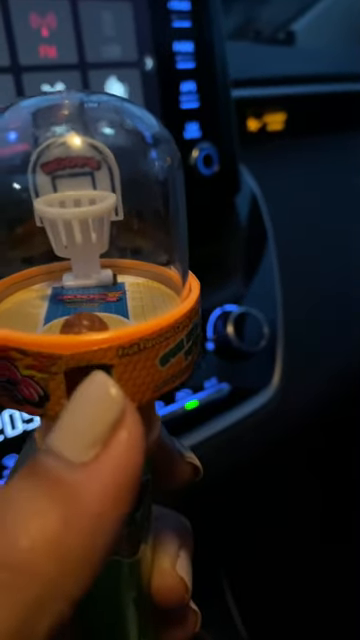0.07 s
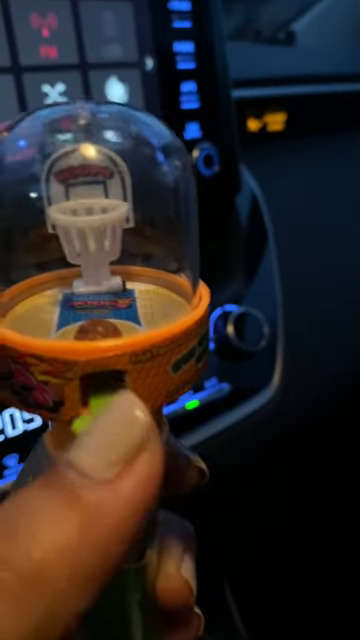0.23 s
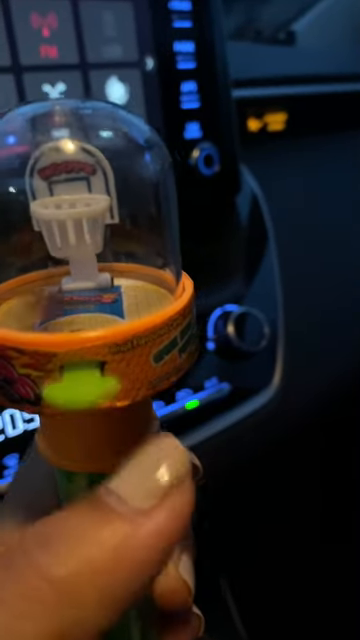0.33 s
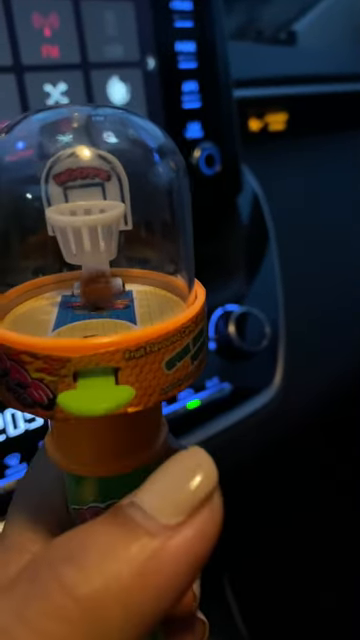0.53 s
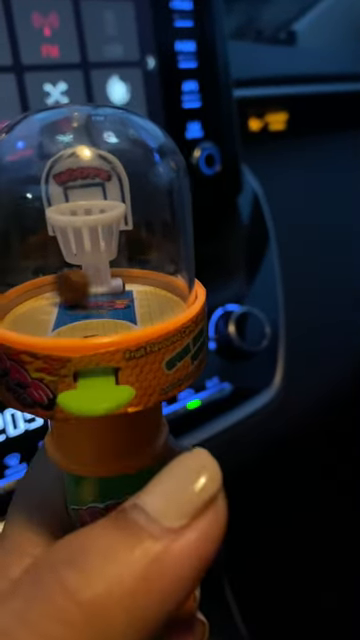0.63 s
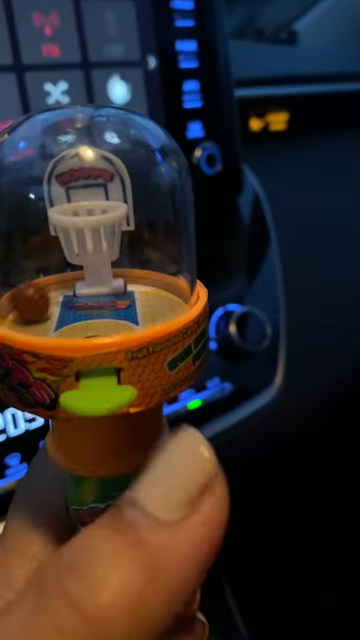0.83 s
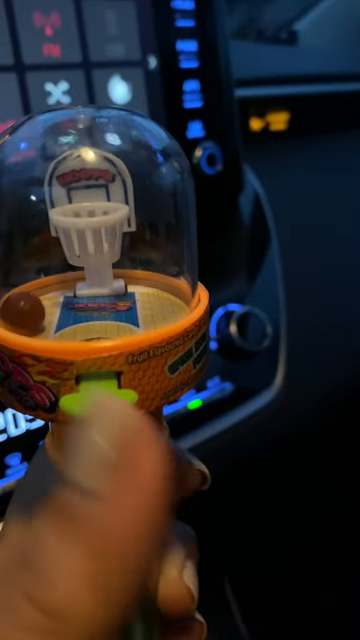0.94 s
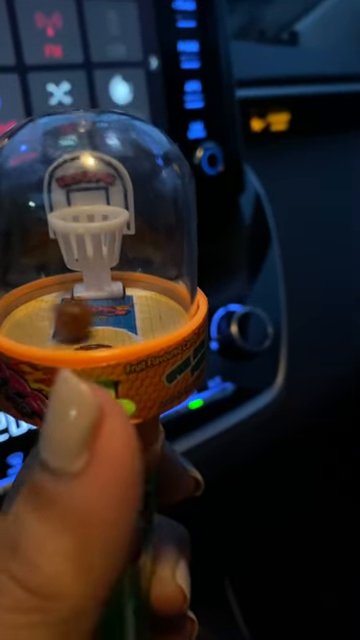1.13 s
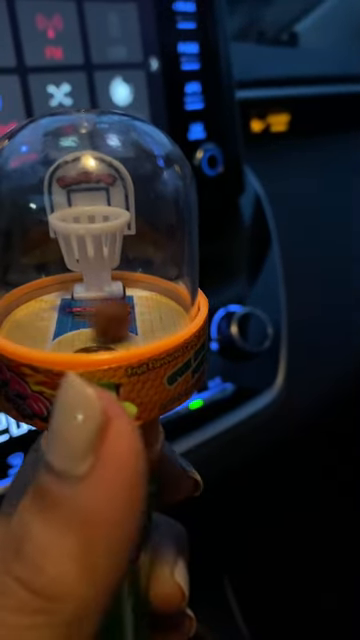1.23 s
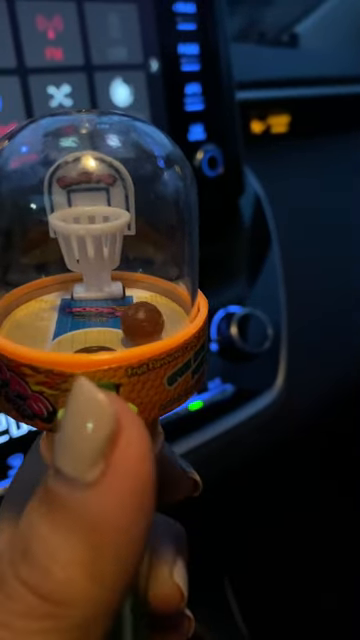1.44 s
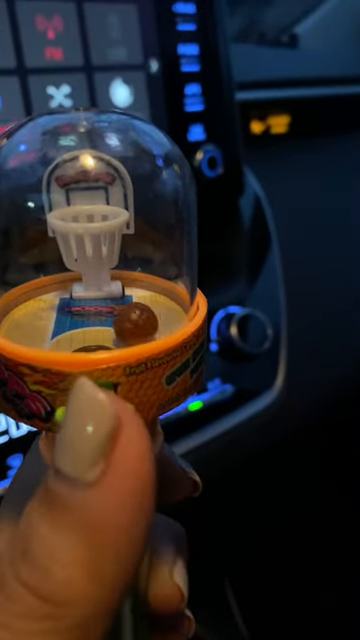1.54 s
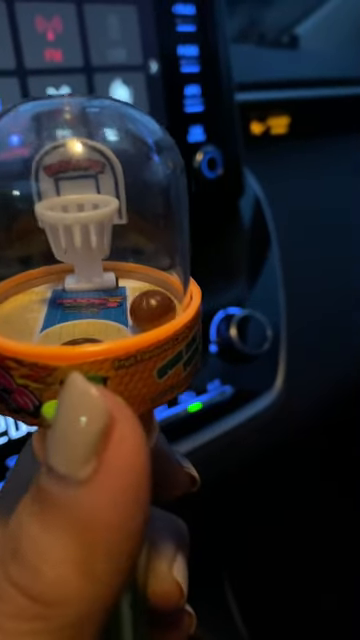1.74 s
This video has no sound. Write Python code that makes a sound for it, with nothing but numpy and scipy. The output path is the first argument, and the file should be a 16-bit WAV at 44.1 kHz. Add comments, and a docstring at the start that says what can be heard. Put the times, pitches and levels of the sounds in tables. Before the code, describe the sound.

Close up inside a softly humming parked car, a plastic toy's lever lets go with one loud snap. A tiny ball then ticks and rattles unevenly around the toy's dome and floor, growing fainter.

```python
"""Toy basketball in a parked car

A thumb flicks the lever of a small plastic toy, close to the microphone. The lever scrapes and snaps,
the ball pings, clicks against the clear dome, then bounces and rolls on the court. Each hit is a set of
ringing plastic modes over a burst of clatter. The car hums softly underneath, its cabin adds a short
echo, and the recorder's gain control ducks after the snap."""
import sys
import numpy as np
from scipy import signal
from scipy.fft import rfft, irfft
from scipy.io import wavfile
from scipy.ndimage import uniform_filter1d, minimum_filter1d

SR = 44100
rng = np.random.default_rng(int(sys.argv[2]) if len(sys.argv) > 2 else 0)


def dump_mix(stems):
    """Bounce the given channels to the path in sys.argv[1] as a 16-bit WAV at rate SR."""
    frames = np.atleast_2d(stems).T  # one column per channel
    limited = np.clip(frames, -1, 1)  # hard clip at full scale
    pcm = np.round(limited * 32767).astype(np.int16)
    wavfile.write(sys.argv[1], SR, pcm)


N = 79380

# Spectrum of the car's rumble (frequency [Hz], relative level [dB])
RUMBLE_SPECTRUM = [(12, -30.5), (20, -13), (81, -4.5), (138, -5.5), (187, -13.5), (270, -8), (357, -18),
                   (446, -12.5), (678, -19.5), (1530, -36.5), (1960, -46), (2260, -43), (3250, -53),
                   (3740, -52.5), (16000, -66)]
RUMBLE_DB = -52.5
# Resonances of the clear dome (frequency [Hz], relative level [dB], t60 [s])
DOME_MODES = [(2130, -16, 0.058), (2720, -17.5, .028), (4750, -19.5, 0.066), (5840, -13, .026),
              (5880, -16.5, 0.023), (8910, -10, 0.066), (11300, -21.5, .03), (15450, -20, .02)]
# Spectrum of the dome's clatter (frequency [Hz], relative level [dB])
DOME_CLATTER = [(150, -33), (550, -10), (1500, -22.5), (2400, -7), (3300, -11.5), (5500, -7.5),
                (8000, -11.5), (11500, -13.5), (12500, -19), (15500, -18)]
DOME_T60_S = .035


def amp(db):
    """Decibels to gain."""
    return 10 ** (np.asarray(db) / 20)


def curve_at(points, hz):
    """Reads a curve of (frequency, value) points on a log-frequency axis."""
    point_hz, value = np.transpose(points)
    return np.interp(np.log(hz + 1), np.log(point_hz + 1), value)


def equalise(x, curve):
    """Minimum-phase EQ along a (frequency [Hz], gain [dB]) curve, so attacks stay sharp."""
    hz = abs(np.fft.fftfreq(len(x), 1 / SR))
    log_gain = np.log(amp(curve_at(curve, hz)))
    response = np.exp(np.conj(signal.hilbert(log_gain)))
    return np.fft.ifft(np.fft.fft(x) * response).real


def rumble(level_db):
    """The car's steady, bass-heavy noise at a given rms level."""
    shape = amp(curve_at(RUMBLE_SPECTRUM, np.fft.rfftfreq(N, 1 / SR)))
    noise = irfft(rfft(rng.standard_normal(N)) * shape, N)
    return amp(level_db) * noise / np.sqrt(np.mean(noise ** 2))


def idle_hum(waver_depth=.75, waver_s=.22):
    """The idling car: low tones, each wavering slowly in level and phase."""
    # Tones of the hum (frequency [Hz], level before wavering [dB])
    tones = [(25.4, -60.5), (51, -52.5), (75.3, -52.5), (101.8, -61.5), (127, -58), (255, -64.5),
             (301, -66), (458, -66)]
    t, bin_hz = np.arange(N) / SR, np.fft.fftfreq(N, 1 / SR)
    slow_band = np.exp(-(bin_hz * waver_s) ** 2) * (bin_hz > 0)
    hum = np.zeros(N)
    for hz, db in tones:
        drift = np.fft.ifft(np.fft.fft(rng.standard_normal(N)) * slow_band)
        waver = 1 + waver_depth * drift / np.std(drift)
        tone = np.exp(2j * np.pi * (hz * t + rng.random()))
        hum += np.sqrt(2) * amp(db) * (waver * tone).real
    return hum


def strike(modes, clatter, clatter_t60_s, level_db, bass_db, treble_db, spot_hz=None, spot_db=0):
    """One hit on plastic: modes over a quick clatter, coloured by the contact, plus the spot's ring."""
    attack_s, detune = .0004, .014
    crack_db, crack_t60_s = 2, .007
    spot_swell_s, spot_t60_s = .0018, .026
    t = np.arange(6144) / SR
    onset = t < .008  # the layers are balanced over this stretch
    ring = np.zeros(len(t))
    for hz, db, t60_s in modes:
        loss_db = 8 * np.sqrt(hz / 2200) * (1 - rng.random())  # high modes vary most from hit to hit
        detuned_hz = hz * (1 + detune * (2 * rng.random() - 1))
        ring += amp(db - loss_db - 60 * t / t60_s) * np.sin(2 * np.pi * detuned_hz * t)
    crack = amp(crack_db - 60 * t / crack_t60_s)  # the contact itself cracks first
    fade = crack + amp(-60 * t / clatter_t60_s)
    burst = equalise(rng.choice([-1., 1.], len(t)) * fade, clatter)
    hit = (ring + burst) * np.minimum(t / attack_s, 1)
    contact_eq = [(456, 0), (1200, bass_db), (2180, 0), (9000, treble_db)]
    hit = equalise(hit / np.std(hit[onset]), contact_eq)
    if spot_hz:
        envelope = np.minimum(t / spot_swell_s, 1) * amp(-60 * t / spot_t60_s)
        spot = np.sin(2 * np.pi * spot_hz * t) * envelope
        hit = (hit + amp(spot_db) * spot / np.std(spot[onset])) / np.hypot(1, amp(spot_db))
    return amp(level_db) * hit


def play_hits(hits, modes, clatter, clatter_t60_s):
    """Strikes one plastic part afresh at each listed time."""
    track = np.zeros(N)
    for time_s, *contact in hits:
        hit = strike(modes, clatter, clatter_t60_s, *contact)
        slot = track[round(time_s * SR):][:len(hit)]
        slot += hit[:len(slot)]
    return track


def bumps(start_s, end_s, level_db, per_s, treble_db, jitter=.13, spread_db=4):
    """Lists an uneven run of up to 16 tiny hits, from rolling or dragging."""
    return [(start_s + (k + jitter * late) / per_s, level_db + spread_db * strong, 0, treble_db)
            for k, (late, strong) in enumerate(rng.standard_normal((16, 2)))
            if start_s + k / per_s < end_s]


def lever_scrape():
    """The lever drags faintly before it lets go: quick slips, voiced with the dome's resonances."""
    slips = bumps(start_s=.175, end_s=.203, level_db=-61, per_s=330, treble_db=-8.5)
    return play_hits(slips, DOME_MODES, DOME_CLATTER, DOME_T60_S)


def lever_snap():
    """The lever lets go in a tight cluster of plastic knocks."""
    # Lever knocks (time [s], level [dB], bass [dB], treble [dB], spot ring [Hz], ring vs hit [dB])
    knocks = [(.2035, -30, 0.5, -10.5, 5850, -9), (.2149, -15.5, -6, 1.5, 3376, -6),
              (.2185, -25, 11.5, -3, 987, -2.5), (.2703, -28, 7, 6.5, 2030, -4)]
    # Resonances of the lever (frequency [Hz], relative level [dB], t60 [s])
    modes = [(610, -6, .04), (722, 8, .036), (815, 3, .03), (1048, 4, .045), (2010, -8, .07),
             (3263, 9, .016), (3520, 9, .015), (5700, 9, .024), (7000, 3, .014), (8750, -1, .024),
             (11300, -1, .02), (15400, -3, .014)]
    # Spectrum of its clatter (frequency [Hz], relative level [dB])
    clatter = [(80, 4), (450, -3), (750, 5), (1500, -1), (2200, 8), (3300, 10), (4300, 8), (6000, 10),
               (11700, 6.5), (12800, 1), (15500, 3)]
    return play_hits(knocks, modes, clatter, clatter_t60_s=.047)


def hand_thump(start_s=.222, hz=90, level_db=-32, t60_s=.14):
    """The snap jolts the whole toy in the hand: a soft, low thud."""
    t = np.maximum(np.arange(N) / SR - start_s, 0)
    return amp(level_db - 60 * t / t60_s) * np.sin(2 * np.pi * hz * t)


def ball_pings():
    """The launched ball lands two hard, bright hits."""
    # Hard hits (time [s], level [dB], bass [dB], treble [dB], spot ring [Hz], ring vs hit [dB])
    pings = [(0.2316, -16.5, 2, 2.5, 11410, 2.5), (0.2386, -15, -3.5, 0.5, 10190, 8)]
    # Resonances of a ping (frequency [Hz], relative level [dB], t60 [s])
    modes = [(5604, 0, .016), (9030, -1.5, 0.051), (9700, 1.5, .022), (15545, -12, .03)]
    # Spectrum of its clatter (frequency [Hz], relative level [dB])
    clatter = [(500, -2.5), (1600, -8.5), (2500, 6), (3400, -7.5), (5000, -0.5), (8000, 2), (9000, 7),
               (11400, 13), (12400, 3), (14200, 2.5)]
    return play_hits(pings, modes, clatter, clatter_t60_s=.012)


def dome_clicks():
    """The ball clicks against the dome and its rim."""
    # Dome hits (time [s], level [dB], bass [dB], treble [dB], spot ring [Hz], ring vs hit [dB])
    clicks = [(0.2632, -36, 5, 16, 5730, -20), (0.3035, -32, 11, -2, 2040, -6.5),
              (.3671, -36, 15, -10, 2240, -13), (0.3777, -25, 2, 8, 8800, -2.5),
              (0.8471, -36, 12, 1, 2830, -5), (0.871, -44.5, 17, -30, 2690, -14),
              (0.9518, -58, 25.5, -38.5, 3090, -12), (1.012, -50, 12.5, -40, 3237, -14.5),
              (1.2499, -40.5, 8.5, -5, 2294, -1.5), (1.2849, -27, -4.5, -8.5, 5640, -6),
              (1.2942, -38, 4, -18, 8880, -9.5), (1.5981, -46.5, 4, -17, 5740, -16.5),
              (1.6288, -52, -3, -18.5, 5660, -14), (1.6658, -55, 6, -27, 5800, -25),
              (1.6922, -47.5, -4, -21, 2780, -16)]
    return play_hits(clicks, DOME_MODES, DOME_CLATTER, DOME_T60_S)


def ball_on_court():
    """The ball bounces on the plastic court and rolls over its bumps."""
    # Bounces (time [s], level [dB], bass [dB], treble [dB])
    bounces = [(.4215, -48.5, 0.5, 0.5), (0.4536, -38, -7.5, 0), (0.4705, -38, -6, 5),
               (.4855, -40.5, -6, -2), (0.5184, -52, 12, 4), (0.5318, -42, -5.5, -11.5),
               (.5375, -48, 12.5, 5.5), (.582, -42, -2.5, 0.5), (0.6193, -51, 4.5, -4),
               (0.6824, -50.5, 5, -1.5), (0.6862, -53, 4, 1.5), (.7712, -46.5, 16, 11),
               (0.795, -51.5, 6, -2), (0.834, -53.5, 7.5, -19.5), (.9875, -64.5, 16.5, -24),
               (1.0443, -52, 8.5, -24.5), (1.0673, -43, -4, -0.5), (1.0877, -44.5, 1, 0),
               (1.1083, -43.5, -8, 5.5), (1.119, -64.5, 20.5, -15), (1.1586, -52, -1, 6),
               (1.168, -53.5, 4.5, -9), (1.217, -41, -3, 7), (1.2355, -52.5, -1.5, 1), (1.274, -43, -2, -2),
               (1.3118, -50.5, 8, 11), (1.3318, -54, 6, 7), (1.3945, -51.5, 0, 4.5), (1.4303, -54, -0.5, 7),
               (1.5504, -58.5, 2, 2), (1.5808, -48, -6, 5.5)]
    # Short rolls (start [s], end [s], level [dB], bump rate [1/s], treble [dB])
    rolls = [(0.3086, 0.356, -44, 110, 14), (0.43, 0.45, -47, 190, 0.5), (0.472, 0.506, -62.5, 120, 5),
             (0.857, .925, -63.5, 140, -4)]
    # Resonances of the court (frequency [Hz], relative level [dB], t60 [s])
    modes = [(594, -15, .05), (1097, -18, .04), (2160, -6, .026), (2320, -10, .022), (2720, -18, .025),
             (5410, -25, .018), (8860, -21, .017)]
    # Spectrum of its clatter (frequency [Hz], relative level [dB])
    clatter = [(250, -36.5), (1100, -3.5), (1700, -28), (2300, 6.5), (2900, -18.5), (3800, -24.5),
               (4600, -20.5), (5600, -18.5), (6800, -26), (9000, -34.5), (11800, -34), (13500, -37)]
    clatter_t60_s = .05
    bouncing = play_hits(bounces, modes, clatter, clatter_t60_s)
    roll_bumps = [bump for roll in rolls for bump in bumps(*roll)]
    return bouncing + play_hits(roll_bumps, modes, clatter, clatter_t60_s)


def cabin_tail(level_db, predelay_s=.011):
    """Impulse response of the padded cabin: a short noise tail whose highs die first."""
    # Decay of the cabin's echo (frequency [Hz], t60 [s])
    decay_times = [(300, 0.21), (2000, 0.1), (6000, 0.089), (14000, 0.043)]
    hz, t, noise = signal.stft(rng.standard_normal(16384), SR, nperseg=256)
    decay = amp(-60 * t / curve_at(decay_times, hz)[:, None])
    tail = signal.istft(noise * decay, SR)[1]
    tail *= np.arange(len(tail)) / SR > predelay_s
    return amp(level_db) * tail / np.linalg.norm(tail)


def mic_ports(mono):
    """Two microphone ports hear the same sound with different phase and level."""
    # Phase between the ports (frequency [Hz], left lead [rad])
    phase_lead = [(60, 0), (300, -.2), (900, -.35), (2150, .1), (2900, 2.0), (3800, .7), (4300, 1.4),
                  (4800, 3.8), (5500, 6.7), (8000, 7.7), (9000, 8.0), (10250, 8.35), (11300, 8.75),
                  (12200, 9.2)]
    # Balance between the ports (frequency [Hz], left minus right [dB])
    balance = [(100, 0), (300, 1), (1200, -.7), (2100, -2.5), (2600, -6), (3400, -1), (4100, -3),
               (5400, 1.5), (7000, 0)]
    hz, spectrum = np.fft.rfftfreq(2 * N, 1 / SR), rfft(mono, 2 * N)
    side_db = curve_at(balance, hz) / 2
    left = spectrum * amp(side_db)
    right = spectrum * amp(-side_db) * np.exp(-1j * curve_at(phase_lead, hz))
    return irfft([left, right])[:, :N]


def scene():
    """The toy in the cabin over the car's hum; part of the echo and rumble differs between the ports."""
    car = rumble(RUMBLE_DB) + idle_hum()
    shared_tail = cabin_tail(level_db=-24.5)
    port_tails = np.array([cabin_tail(level_db=-21) for _ in range(2)])
    side_rumble = signal.lfilter(*signal.butter(1, 250, "high", fs=SR), rumble(RUMBLE_DB - 11.5))
    toy = lever_snap() + hand_thump() + ball_pings() + dome_clicks() + ball_on_court() + lever_scrape()
    shared_echo = signal.fftconvolve(toy, shared_tail)[:N]
    wide_echo = signal.fftconvolve(toy[None], port_tails, axes=1)[:, :N]
    return mic_ports(toy + shared_echo + car) + wide_echo + np.array([side_rumble, -side_rumble])


def record(dry):
    """Gain control ducks after a loud sound, holds and recovers; a steep low-pass trims the top."""
    threshold_db, max_duck_db, cutoff_hz = -25.5, 16, 15900
    lag, hold, glide = (int(seconds * SR) for seconds in (.035, .14, .044))
    power = signal.lfilter(*signal.butter(1, 30, fs=SR), (dry ** 2).mean(0))
    level_db = 10 * np.log10(abs(power) + 1e-12)
    target_db = -np.clip(level_db - threshold_db, 0, max_duck_db)
    late_db = np.pad(target_db, (lag, 0))[:N]  # the lag lets the snap's attack through
    held_db = minimum_filter1d(late_db, hold, origin=(hold - 1) // 2, mode="nearest")
    gain_db = uniform_filter1d(held_db, glide, origin=(glide - 1) // 2, mode="nearest")
    low_pass = signal.firwin(255, cutoff_hz, window=("kaiser", 9), fs=SR)
    return signal.oaconvolve(dry * amp(gain_db), low_pass[None], "same")


dry = scene()
out = record(dry)
dump_mix(out)
```